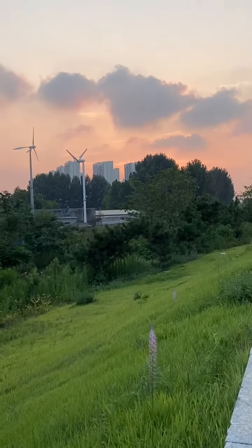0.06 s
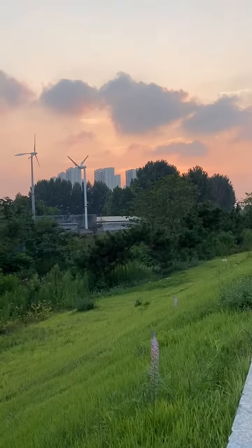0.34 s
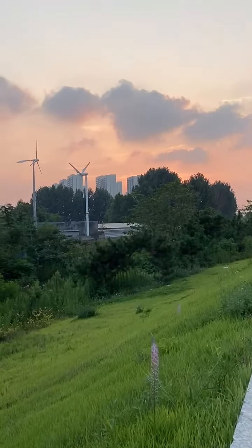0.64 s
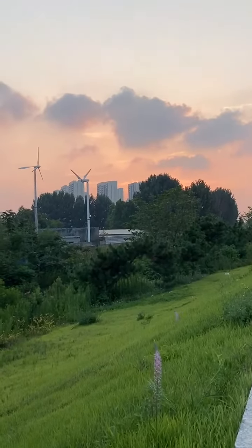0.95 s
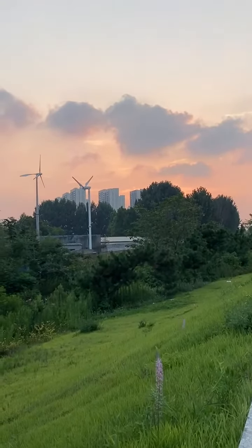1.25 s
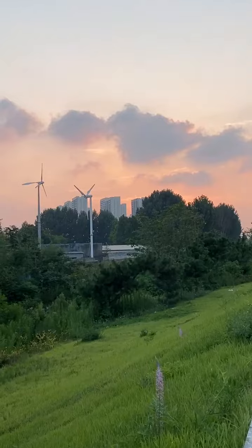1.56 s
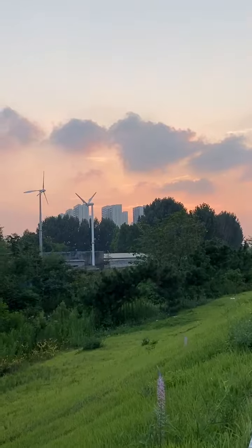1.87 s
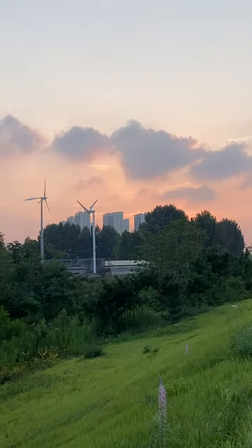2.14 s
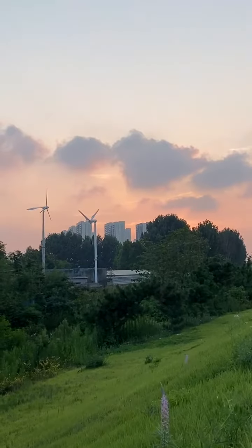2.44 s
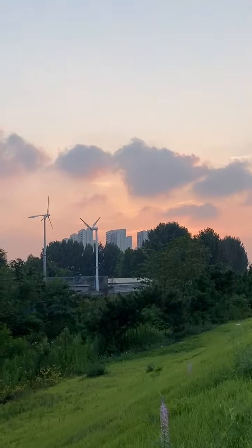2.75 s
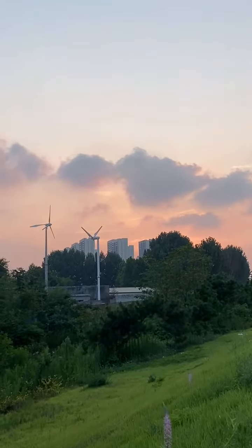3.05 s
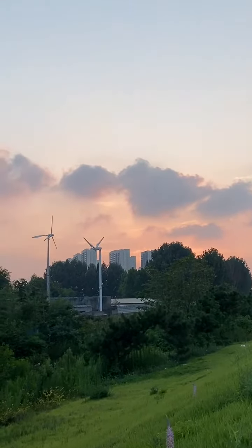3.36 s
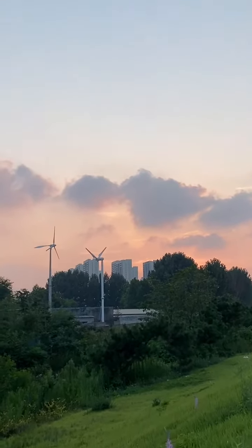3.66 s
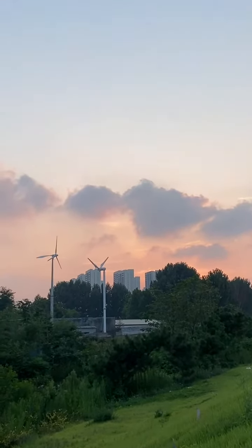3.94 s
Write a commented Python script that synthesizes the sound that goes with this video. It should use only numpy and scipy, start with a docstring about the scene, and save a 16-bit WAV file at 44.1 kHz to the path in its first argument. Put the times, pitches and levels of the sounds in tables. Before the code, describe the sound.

Crickets keep up a steady, high buzz in an open grassy place, over a soft hush. Small birds twitter faintly in far trees, while a light breeze rumbles and bumps the microphone in short, low puffs.

```python
"""Dusk on a grassy bank. From the start, bush crickets scrape their wings in a steady buzz near 10 kHz,
two close by and a chorus behind, over a soft hush and the rumble of a light breeze. Small birds
twitter and trill in the far trees, then return in snatches. Eddies bump the microphone in
short, low puffs: a cluster near 1.7 s, the strongest at 2.3 s.
Hoarse chips and low wind puffs recur over the hush and the crickets' buzz."""
import sys
import numpy as np
from scipy import signal
from scipy.fft import rfft, irfft, next_fast_len
from scipy.io import wavfile
from scipy.ndimage import map_coordinates

SR = 44100
rng = np.random.default_rng(int(sys.argv[2]) if len(sys.argv) > 2 else 0)


def to_wav(s):
    """Save 16-bit WAV."""
    ch = np.atleast_2d(s).T  # columns
    pcm = np.round(np.clip(ch, -1, 1) * 32767)  # PCM
    wavfile.write(sys.argv[1], SR, pcm.astype(np.int16))


N = 176400


def amp(db):
    """Decibels to gain."""
    return 10 ** (np.asarray(db) / 20)


def unit(x):
    """Scale to rms 1."""
    return x / np.sqrt(np.mean(x ** 2) + 1e-20)


def seconds():
    """Time of each sample."""
    return np.arange(N) / SR


def curve(rows):
    """(time [s], value) rows as one value per sample."""
    return np.interp(seconds(), *np.transpose(rows))


def wobble(knots_per_s):
    """Smooth random curve."""
    knots = rng.standard_normal(int(N * knots_per_s / SR) + 4)
    return map_coordinates(knots, [seconds() * knots_per_s])


def filtered(x, response):
    """Apply the gain response(hz) to x."""
    size = next_fast_len(N + 8192)
    return irfft(rfft(x, size) * response(np.fft.rfftfreq(size, 1 / SR)), size)[:N]


def noise(spectrum):
    """Noise of rms 1, coloured by (frequency [Hz], relative density [dB]) rows."""
    knots_hz, db = np.transpose(spectrum)
    white = rng.standard_normal(N)
    return unit(filtered(white, lambda hz: amp(np.interp(np.log(hz + 1), np.log(knots_hz), db))))


# (frequency [Hz], relative density [dB])
HUSH_SPECTRUM = [(30, -0.5), (200, 5.5), (450, 3.5), (800, 1.5), (1400, -4), (2000, -3.5), (3200, -8.5),
                 (4400, -13.5), (5500, -17.5), (6100, -29.5), (6900, -44), (13000, -65)]
# (time [s], gain [dB])
HUSH_TREBLE_GAIN = [(0, -2), (.42, -1.5), (.7, -0.5), (1.3, -2.5), (1.75, -2.5), (2.1, -0.5), (2.4, .5),
                    (2.8, -1.5), (3.15, -2), (3.32, -1), (3.5, -1.5), (3.7, -6.5), (4, 4)]


def hush(level_db=-61.5, treble_hz=2300):
    """Far trees and town: soft noise whose treble ebbs and swells."""
    bed = amp(level_db + .13 * wobble(8.7)) * noise(HUSH_SPECTRUM)
    treble = filtered(bed, lambda hz: hz ** 4 / (hz ** 4 + treble_hz ** 4))
    treble_gain = amp(curve(HUSH_TREBLE_GAIN) + .8 * wobble(12))
    return bed - treble + treble * treble_gain


# (frequency [Hz], relative density [dB])
BREEZE_SPECTRUM = [(15, -16), (40, 0.5), (80, 5), (120, -6.5), (200, -18), (350, -28), (800, -81.5)]
# (time [s], level [dB])
BREEZE_LEVEL = [(0, -49), (.2, -54.5), (.75, -49.5), (1.05, -57.5), (1.45, -43), (1.6, -56), (1.95, -49),
                (2.17, -60.5), (2.45, -60), (2.65, -58), (2.85, -44), (3, -56.5), (3.3, -49.5),
                (3.5, -47.5), (4, -46.5)]


def breeze():
    """Low, restless wind rumble between the puffs."""
    return amp(curve(BREEZE_LEVEL) + .61 * wobble(41)) * noise(BREEZE_SPECTRUM)


def chirp(at_s, db, hz, sigma_s, fall_per_s, rasp_hz, rasp_knots_per_s=1400):
    """Falling whistle under a Gaussian envelope; pitch jitter makes it hoarse."""
    out = np.zeros(N)
    near = np.abs(seconds() - at_s) < .1
    t = seconds()[near] - at_s
    jitter = np.interp((t - t[0]) * rasp_knots_per_s, np.arange(1024), rng.standard_normal(1024))
    pitch_hz = hz * np.exp(-fall_per_s * t) + rasp_hz * jitter
    envelope = amp(db) * np.sqrt(2) * np.exp(-(t / sigma_s) ** 2 / 2)
    out[near] = envelope * np.sin(2 * np.pi * np.cumsum(pitch_hz) / SR)
    return out


def chatter(notes_per_s=27, level_db=-75, centre_hz=3170):
    """Farthest birds: faint random notes spread over an octave."""
    draws = rng.random((round(notes_per_s * N / SR), 3))
    return sum(chirp(when * N / SR, level_db + 6 * (size - .5), centre_hz * 2 ** (pitch - .5),
                     sigma_s=.0039, fall_per_s=14, rasp_hz=268) for when, size, pitch in draws)


# (time [s], source level [dB], pitch [Hz])
TWITTER_NOTES = [(.008, -62.5, 3900), (0.038, -62.5, 3850), (0.05, -66.5, 4600), (.073, -63.5, 3800),
                 (0.085, -69, 4600), (.108, -62, 3700), (.121, -66, 4500), (0.195, -65, 5250),
                 (.238, -64, 5100), (.955, -67.5, 4100), (1.009, -66, 4100), (1.021, -71, 4600),
                 (1.038, -61, 3850), (1.053, -69, 4600), (1.072, -63.5, 4000), (1.086, -69, 4500),
                 (1.15, -68, 5200), (1.199, -63, 5000), (2.24, -69.5, 3600), (2.272, -65, 3800),
                 (2.335, -72, 3600), (3.249, -67, 3200), (3.276, -66, 3700), (3.29, -67, 3000),
                 (3.305, -66, 3650), (3.321, -66, 3300), (3.34, -70, 3400), (3.839, -66, 3200),
                 (3.87, -65, 3200), (3.898, -64.5, 3800), (3.945, -75, 3500)]


def twitter():
    """Runs of short, steeply falling notes."""
    return sum(chirp(at_s, db, hz, sigma_s=.0033, fall_per_s=37, rasp_hz=224)
               for at_s, db, hz in TWITTER_NOTES)


# last note of each trill: (time [s], source level [dB])
TRILL_ENDS = [(0.173, -69), (.297, -68), (2.01, -70.5), (2.14, -71.5), (3.59, -70.5), (3.713, -71),
              (3.837, -70)]


def trills(hz=5340, step_s=.0125, step_db=.5):
    """Three thin notes each, swelling slightly to the last."""
    return sum(chirp(end_s - k * step_s, db - k * step_db, hz, sigma_s=.0025, fall_per_s=16, rasp_hz=60)
               for end_s, db in TRILL_ENDS for k in range(3))


# (time [s], upper source level [dB], lower source level [dB], upper pitch [Hz], envelope sigma [s])
CHIP_CALLS = [(0.211, -72, -64.5, 5510, .011), (0.642, -65, -73, 4880, 0.0097),
              (.845, -67, -71, 4600, .017), (1.165, -72, -63, 5600, 0.016), (1.4, -66, -68.5, 4750, 0.02),
              (1.55, -68.5, -69.5, 4620, 0.017), (2.315, -70.5, -65.5, 4870, 0.019),
              (2.431, -61, -63.5, 4810, 0.013), (2.622, -63.5, -71, 4580, 0.011),
              (3.537, -66, -65.5, 4670, 0.012), (3.937, -61, -69, 4520, 0.0073),
              (4.003, -53.5, -49.5, 4800, 0.013)]


def chips(low_ratio=.72, low_lag_s=.0086, fall_per_s=2.5, rasp_hz=544):
    """Hoarse two-voiced calls; the lower voice lags."""
    return sum(chirp(at_s, high_db, hz, sigma_s, fall_per_s, rasp_hz)
               + chirp(at_s + low_lag_s, low_db, hz * low_ratio, sigma_s, fall_per_s, rasp_hz)
               for at_s, high_db, low_db, hz, sigma_s in CHIP_CALLS)


def foliage_echo(x, t60_s=.25, gain_db=-3):
    """Short, diffuse reflection from the trees."""
    t = np.arange(SR // 2) / SR
    tail = rng.standard_normal(len(t)) * amp(-60 * t / t60_s)
    return amp(gain_db) * signal.fftconvolve(x, tail / np.linalg.norm(tail))[:N]


# (frequency [Hz], gain [dB])
AIR_RESPONSE = [(2000, 2.5), (4200, -1.5), (5500, -3.5), (6200, -3), (7200, -26)]


def birds():
    """All calls, dulled by the air and echoed by the foliage."""
    calls = chatter() + twitter() + trills() + chips()
    distant = filtered(calls, lambda hz: amp(np.interp(hz, *np.transpose(AIR_RESPONSE))))
    return distant + foliage_echo(distant)


def burst(x, t, db, rise_s, fall_s, crest_s=.0085):
    """Swell x to a rounded crest at t = 0, then let it decay."""
    envelope = np.exp((crest_s - np.hypot(t, crest_s)) / np.where(t < 0, rise_s, fall_s))
    return amp(db) * unit(envelope * x) * np.sqrt(np.mean(envelope ** 2))


# turbulence at nominal speed: (frequency [Hz], relative density [dB])
EDDY_SPECTRUM = [(20, -22.5), (70, -2.5), (165, 1), (280, -4), (420, -9.5), (600, -25), (900, -46.5),
                 (2000, -88.5)]
# (frequency [Hz], relative density [dB])
WAKE_SPECTRUM = [(20, -37.5), (45, -2.5), (75, -2.5), (105, -4), (150, -13.5), (250, -33.5), (500, -80)]
# (time [s], level [dB], rise [s], fall [s], upper edge at crest [Hz], wake level [dB])
WIND_PUFFS = [(.037, -36, .012, .013, 280, -40), (.112, -45, .005, .009, 400, -54),
              (.298, -48, .012, .012, 260, -48), (.372, -43, .03, .016, 280, -42),
              (.53, -31, .019, .016, 450, -32), (.705, -52, .02, .025, 220, -47),
              (1.328, -45, .02, .015, 270, -54), (1.372, -49, .01, .04, 270, -45),
              (1.48, -48, .025, .02, 230, -48), (1.66, -35, .007, .013, 540, -54),
              (1.69, -34, .004, .008, 600, -50), (1.703, -29, .003, .011, 580, -38),
              (1.735, -28, .004, .007, 620, -36), (1.749, -27, .002, .004, 630, -35),
              (1.785, -43, .015, .035, 330, -47), (2.021, -36, .007, .015, 270, -36),
              (2.06, -44, .012, .015, 260, -50), (2.29, -20, .005, .009, 280, -34),
              (2.317, -27, .007, .012, 250, -38), (2.5, -48, .008, .012, 270, -43),
              (2.545, -47, .012, .012, 220, -42), (2.73, -30, .004, .013, 480, -33),
              (2.8, -38, .016, .026, 540, -41), (3.06, -48, .012, .025, 300, -48),
              (3.125, -49, .02, .025, 230, -47), (3.178, -36, .009, .009, 430, -32),
              (3.245, -51, .012, .02, 260, -44), (3.42, -51, .02, .04, 240, -49),
              (3.56, -47, .035, .03, 250, -51), (3.633, -31, .007, .014, 420, -42),
              (3.69, -41, .014, .024, 320, -38), (3.89, -28, .004, .009, 390, -32),
              (3.945, -39, .012, .016, 330, -40), (3.981, -33, .014, .025, 430, -38)]


def puffs(nominal_edge_hz=397.5, slowing_s=.05, min_speed_ratio=.4, wake_lag_s=.011, lowpass_hz=1610):
    """Eddies sweep the microphone, fastest and brightest at each crest; a deep wake follows."""
    out = np.zeros(N)
    eddies, wake = noise(EDDY_SPECTRUM), noise(WAKE_SPECTRUM)
    for at_s, db, rise_s, fall_s, edge_hz, wake_db in WIND_PUFFS:
        near = np.abs(seconds() - at_s) < .25
        t = seconds()[near] - at_s
        surge = min_speed_ratio + (1 - min_speed_ratio) * np.exp(-np.abs(t) / slowing_s)
        speed = edge_hz / nominal_edge_hz * surge
        swept = np.interp(rng.uniform(0, N / 2) + np.cumsum(speed), np.arange(N), eddies)
        out[near] += burst(swept, t, db, rise_s, fall_s)
        out[near] += burst(wake[near], t - wake_lag_s, wake_db, rise_s=.014, fall_s=.026)
    return filtered(out, lambda hz: 1 / (1 + (hz / lowpass_hz) ** 6))


# (frequency [Hz], relative density [dB])
WING_RESONANCE = [(6500, -65.5), (7800, -28), (8400, -18.5), (9000, -15), (9450, -4), (9820, 0),
                  (10400, -1), (10950, -15), (12000, -22), (12800, -30), (14000, -70.5)]
# (base level [dB], centre pitch [Hz])
CLOSE_CRICKETS = [(-78.5, 9930), (-82, 10050)]
# whole buzz: (time [s], gain [dB])
BUZZ_GAIN = [(0, -1.5), (.25, 0.5), (.6, -1), (1.5, -0.5), (1.75, -2.5), (2.1, -1), (2.5, 0), (3.05, 0),
             (3.6, -.5), (4, 0)]


def crickets(chorus_db=-76, strokes_per_s=(127.7, 131.0), sharpness=2.4, sweep_hz=520, scatter_hz=210):
    """Each wing stroke is a brief scrape that falls in pitch; far singers merge into a hiss."""
    buzz = amp(chorus_db + .5 * wobble(9.4)) * noise(WING_RESONANCE)
    for rate_hz, (db, centre_hz) in zip(strokes_per_s, CLOSE_CRICKETS):
        drifting_rate_hz = rate_hz * (1 + .003 * wobble(4))
        stroke_phase = 2 * np.pi * np.cumsum(drifting_rate_hz) / SR
        pitch_hz = centre_hz - sweep_hz * np.sin(stroke_phase) + scatter_hz * wobble(900)
        strokes = np.exp(sharpness * np.cos(stroke_phase)) * amp(1.8 * wobble(rate_hz))
        scrape = np.sin(2 * np.pi * np.cumsum(pitch_hz) / SR)
        buzz += amp(db) * unit(strokes * scrape)
    return buzz * amp(curve(BUZZ_GAIN))


def scene():
    """Hush, wind, far birds and crickets at one microphone."""
    return (hush() + breeze() + birds() + puffs() + crickets())[None]


def record(dry):
    """Microphone: first-order bass roll-off, hard upper band limit."""
    highpass_hz, top_hz = 39, 13000
    return filtered(dry[0], lambda hz: 1j * hz / (highpass_hz + 1j * hz) * (hz < top_hz))[None]


dry = scene()
out = record(dry)
to_wav(out)
```